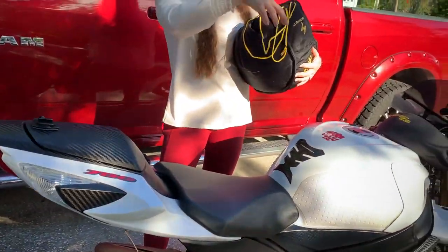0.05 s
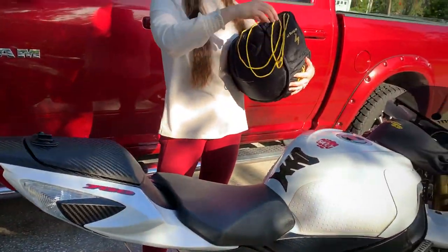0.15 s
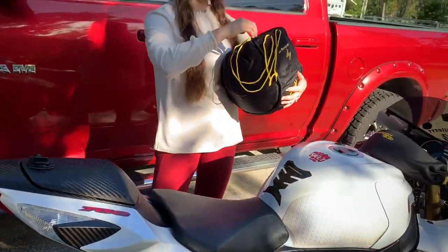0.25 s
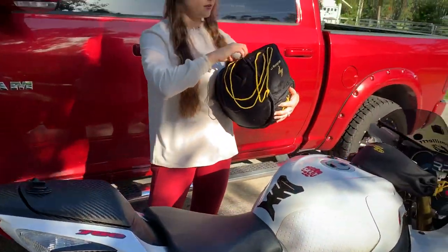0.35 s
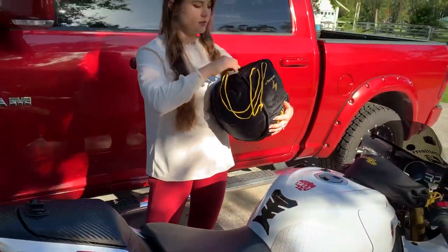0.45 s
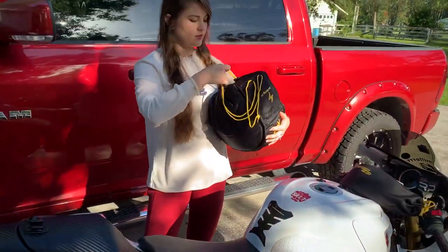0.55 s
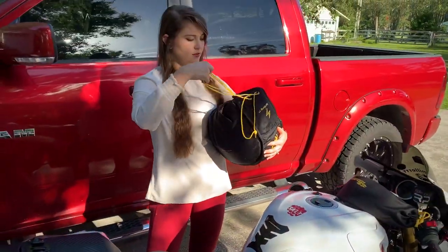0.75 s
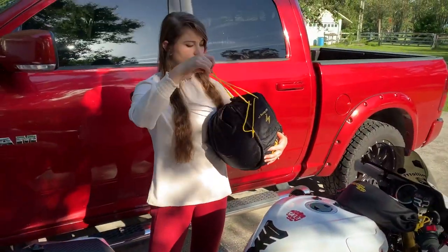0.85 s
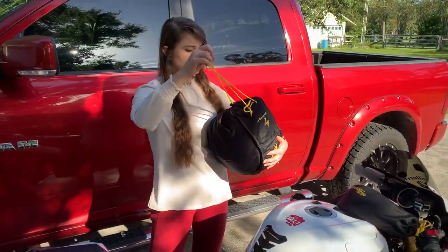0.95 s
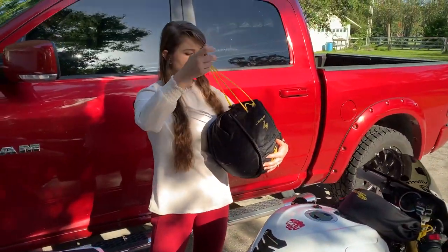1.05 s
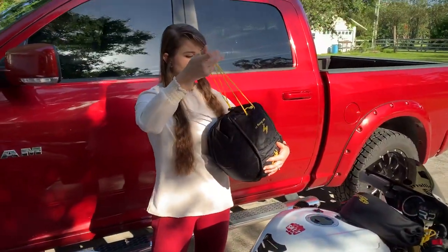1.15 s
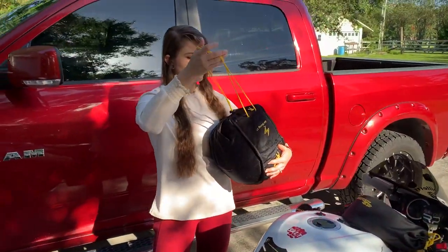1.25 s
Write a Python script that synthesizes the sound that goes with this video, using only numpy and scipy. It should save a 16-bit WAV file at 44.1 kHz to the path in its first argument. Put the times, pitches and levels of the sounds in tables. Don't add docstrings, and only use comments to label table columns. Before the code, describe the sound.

Brief fabric rub, then one loud door-like slam with latch ticks and a low boom that clips. It dies quickly into a quiet yard with distant traffic rumble and a high, quickening cricket rasp.

```python
import sys
import numpy as np
from scipy import signal
from scipy.fft import rfft, irfft
from scipy.io import wavfile

SR = 44100
rng = np.random.default_rng(int(sys.argv[2]) if len(sys.argv) > 2 else 0)


def attenuation_scalar(level_db):
    decades = np.asarray(level_db, float) / 20
    return 10 ** decades


def store_pcm(level_fs):
    pcm = np.round(np.clip(level_fs, -1, 1) * 32767).astype(np.int16)
    wavfile.write(sys.argv[1], SR, np.atleast_2d(pcm).T)


N = 57330

# frequency in Hz, density in dB per Hz.
RUMBLE_SPECTRUM = [(15, -56), (25, -27.5), (40, -9), (69, 4), (205, -18), (253, -13), (316, -25.5),
                   (442, -26), (700, -49), (910, -59), (1540, -120)]
# frequency in Hz, density in dB per Hz.
LEAF_SPECTRUM = [(350, -18.5), (600, -4), (1500, -8), (4500, -4), (7000, -7), (9000, -7.5), (12000, -20.5),
                 (16000, -21.5)]
# time in seconds, level in dB.
BREEZE = [(0, 9), (.15, 2.5), (.5, 4), (.7, 3.5), (1., 7), (1.3, 5)]
# frequency in Hz, likeness [0 to 1].
LIKENESS = [(40, .9), (200, 0.801), (800, 0.28), (3000, 0.23), (7000, 0.27), (10000, 1)]
# frequency in Hz, width in Hz, level in dB.
CHORUS = [(4530, 400, -85), (7020, 2300, -69), (973, 250, -76)]
# time in seconds, strokes so far [count].
STROKES = [(-.0038, -1), (.5043, 12), (.7292, 18), (.8435, 21), (1.3067, 39)]
# time in seconds, level in dB.
CRICKET_LEVEL = [(0, -62.5), (.45, -61.5), (.8, -62.5), (.9, -58.5), (1.15, -55.5), (1.3, -53.5)]
# frequency in Hz, width in Hz, level in dB.
WING_MODES = [(8750, 1200, -2), (12980, 2000, -1.5), (9490, 900, 15.5), (10300, 1000, 12),
              (10930, 810, 1.5)]
# start in seconds, length in seconds, level in dB, ringing in Hz, width in Hz.
SCUFFS = [
    (0.098, 0.019, -43, 1740, 630),
    (0.102, 0.027, -46.5, 3200, 2500),
    (.112, 0.032, -58, 10300, 2500),
    (0.562, 0.035, -53, 1034, 159),
    (0.969, 0.095, -59.5, 1950, 2500),
    (.0, 0.019, -40, 240, 250),
]
# time in seconds, push on the panel in dB, crack in dB, latch tick in dB.
CONTACTS = [(0.1975, -32, -30.5, -27), (0.2063, -24, -36.5, -40), (0.228, -14, -25, -32.5),
            (0.2395, -2.5, -16.5, -17), (.2500, 2.5, -42, -8.5), (0.26, -18.5, -20.5, -4.5),
            (0.277, -25, -31.5, -26.5), (0.295, -14, -33, -34), (0.307, -17, -34.5, -13),
            (0.3252, -25.5, -46, -15.5), (.3310, -24, -29.5, -17.5), (0.3561, -48, -34.5, -20),
            (0.372, -46, -33, -27), (0.402, -36.5, -42, -41)]
# frequency in Hz, level in dB, T60 in seconds.
PANEL_MODES = [(305, -22, 0.033), (348.3, -8.5, 0.1128), (421, -12.5, 0.11), (515.6, -4, 0.033),
               (579.6, -12.5, 0.036), (647.4, -16.5, 0.18), (844, -26.5, 0.076), (921, -30, 0.043),
               (1115.6, -17, 0.15), (1323, -11, 0.034), (1570, -15, 0.032)]
# frequency in Hz, level in dB, T60 in seconds.
LATCH_MODES = [(3240, -8.5, .02), (3510, -16.5, 0.0113), (2500, -22, 0.014), (4644, -22.5, 0.0044)]
# frequency in Hz, density in dB per Hz.
CRACK_SPECTRUM = [(290, -43.5), (500, -2.5), (2730, -6.5), (3340, -8.5), (4280, -10), (9490, -14.5),
                  (13400, -20), (16000, -33.5)]
# time in seconds, level in dB.
CRUNCH_LEVEL = [
    (0.19, -53),
    (0.196, -42),
    (0.212, -19.5),
    (0.222, -35),
    (0.244, -8.5),
    (0.278, -8),
    (0.294, -43),
    (0.38, -46.5),
    (0.45, -55.5),
]
# frequency in Hz, density in dB per Hz.
CRUNCH_SPECTRUM = [(200, -24.5), (500, -7.5), (1000, -4), (1700, -10), (2500, -22), (3350, -19.5),
                   (6000, -34), (16000, -44.5)]
# start in seconds, frequency in Hz (minus pulls inward), level in dB,
# pressed time in seconds, T60 after it in seconds.
HEAVES = [
    (.2070, 367, -17, 0.0082, 0.1),
    (0.23, 261, -32, 0.0017, .04),
    (0.2408, -208, 3.5, 0.01, 0.0069),
    (0.2605, -228, 2, .013, 0.052),
    (0.295, 239, -11.5, 0.027, 0.032),
    (0.309, 244, -14.5, 0.0047, 0.19),
    (0.241, 111.5, -15.5, 0.015, 0.093),
]

RUMBLE_DB, LEAVES_DB = -41.5, -60
AIR_LAG_S, AIR_PAN_DB = -0.00046, -0.3
STROKE_S, TEETH_HZ, TOOTH_DEPTH = 0.015, 390, 0.6
SWISH_DB, SWISH_T60_S, SWISH_BAND_HZ = -48.5, 0.62, [250, 2500]
PUSH_S, PANEL_SCATTER_DB, PANEL_OFFSET_SAMPLES = 0.00028, 6.5, 4
CRACK_T60_S, CRACK_ALIKE = 0.08, 0.63
CRUNCH_DB, GRAINS_PER_S, GRAIN_SPREAD_DB = -3, 7000, 2.5
TRIM_LAG_S, DOOR_LAG_S, DOOR_PAN_DB, HEAVE_PAN_DB = -0.00028, -0.00027, -0.5, 5
ECHO_DB, ECHO_T60_S = -18, 0.15
RISE_S, SHARP_START, SETTLE_S = 0.0023, 0.35, 0.0022
CABIN_S, CABIN_DB, CABIN_T60_S, CABIN_BAND_HZ = 0.27, -31.5, 0.66, [129, 424]
PORT_SPLIT_HZ, PORT_LAG_S = 7700, 0.000227
MIC_LOW_HZ, TOP_HZ, CLIP_KNEE = 40, 16300, 8.0


def rms_one(x):
    return x / np.sqrt(np.mean(x ** 2) + 1e-20)


def in_time(rows):
    return np.interp(np.arange(N) / SR, *np.transpose(rows))


def at_hz(points, hz):
    f, v = np.transpose(points)
    return np.interp(np.log(hz), np.log(np.maximum(f, 1)), v)


def drift(rate_hz):
    r = np.exp(-80 * np.pi * rate_hz / SR)
    slow = signal.lfilter([1], [1, -2 * r, r * r], rng.standard_normal(N // 40 + 2002))[2000:]
    return np.interp(np.arange(N) / 40, np.arange(len(slow)), rms_one(slow - slow.mean()))


def clicks(s, db):
    out = np.zeros(N) + 1e-18
    out[(np.asarray(s) * SR).astype(int)] = attenuation_scalar(db)
    return out


def ring(x, hz, t60_s):
    r, w = attenuation_scalar(-60 / (t60_s * SR)), 2 * np.pi * hz / SR
    return signal.lfilter([0, np.sin(w)], [1, -2 * r * np.cos(w), r * r], x)


def peak(x, hz, width_hz):
    r = np.exp(-np.pi * width_hz / SR)
    poles = [1, -2 * r * np.cos(2 * np.pi * hz / SR), r * r]
    return signal.lfilter([(1 - r * r) / 2, 0, (r * r - 1) / 2], poles, x)


def double_peak(x, hz, width_hz):
    return peak(peak(x, hz, width_hz), hz, width_hz)


def bandpass(x, order, band_hz):
    return signal.sosfilt(signal.butter(order, band_hz, "band", fs=SR, output="sos"), x)


def third_octaves():
    edges = 25 * 2 ** np.arange(0, 9.5, 1 / 3)
    return [([a, b], np.sqrt(a * b)) for a, b in zip(edges, edges[1:])]


def colour(x, spectrum):
    out = 0
    for k, (band_hz, centre_hz) in enumerate(third_octaves()):
        out = out + attenuation_scalar(at_hz(spectrum, centre_hz)) * (-1) ** k * bandpass(x, 2, band_hz)
    return out


def place(x, lag_s, pan_db):
    pair = x + np.zeros((2, 1))
    hz = np.fft.rfftfreq(N + 512, 1 / SR)
    high = 1 / (1 + (PORT_SPLIT_HZ / (hz + 1)) ** 40)
    direct = (1 - high) * np.exp(-2j * np.pi * hz * lag_s)
    turn = direct - high * np.exp(-2j * np.pi * hz * PORT_LAG_S)
    left = irfft(rfft(pair[0], N + 512) * turn / np.abs(turn), N + 512)[:N]
    return np.array([left * attenuation_scalar(pan_db / 2), pair[1] * attenuation_scalar(-pan_db / 2)])


def far_noise(spectrum, patchy_db, fast_hz):
    out, together = 0, drift(2)
    white = rng.standard_normal((2, 2, N + 8000))
    for k, (band_hz, centre_hz) in enumerate(third_octaves()):
        mid, side = bandpass(white[k % 2], 2, band_hz)[:, -N:]
        alike = np.clip(at_hz(LIKENESS, centre_hz), 0, 1)
        flicker_db = patchy_db * (0.16 * together + drift(fast_hz))
        gain = attenuation_scalar(at_hz(spectrum, centre_hz) + flicker_db)
        out = out + gain * (np.sqrt(1 + alike) * mid + np.sqrt(1 - alike) * side * [[1], [-1]])
    return rms_one(out)


def traffic():
    return attenuation_scalar(RUMBLE_DB) * far_noise(RUMBLE_SPECTRUM, patchy_db=1.5, fast_hz=7.4)


def leaves():
    return attenuation_scalar(LEAVES_DB + in_time(BREEZE)) * far_noise(LEAF_SPECTRUM, patchy_db=2.12, fast_hz=25.0)


def chorus():
    out = 0
    for hz, width_hz, db in CHORUS:
        tone = rms_one(double_peak(rng.standard_normal(N), hz, width_hz))
        out = out + attenuation_scalar(db + 2.2 * drift(10.75)) * tone
    return attenuation_scalar(in_time(BREEZE)) * out


def cricket():
    count = in_time(STROKES)
    since_s = count % 1 / np.gradient(count) / SR
    vary_db = rng.standard_normal(60)[count.astype(int) + 1]
    stroke = np.clip(since_s / 0.001, 0, 1) * np.exp(-(since_s / STROKE_S) ** 2) * attenuation_scalar(vary_db)
    teeth = 1 + TOOTH_DEPTH * np.cos(2 * np.pi * TEETH_HZ * since_s)
    scrape = rng.standard_normal(N) + 0.255 * rng.standard_normal((2, N))
    rasp = stroke * teeth * scrape
    wings = sum(attenuation_scalar(db) * double_peak(rasp, hz, width_hz) for hz, width_hz, db in WING_MODES)
    return attenuation_scalar(in_time(CRICKET_LEVEL)) * rms_one(wings)


def cloth():
    t = np.arange(N) / SR
    swish = rms_one(bandpass(rng.standard_normal(N), 2, SWISH_BAND_HZ))
    out = attenuation_scalar(SWISH_DB - 60 * t / SWISH_T60_S) * swish
    for s, length_s, db, hz, width_hz in SCUFFS:
        shape = np.sin(np.pi * np.clip((t - s) / length_s, 0, 1) ** 0.6)
        out += attenuation_scalar(db) * shape * rms_one(double_peak(rng.standard_normal(N), hz, width_hz))
    return out


def crunch():
    size = attenuation_scalar(GRAIN_SPREAD_DB * np.minimum(rng.exponential(1, N), 4))
    grains = (rng.random(N) < GRAINS_PER_S / SR) * size * rng.choice([-1, 1], N)
    before, after = (CRUNCH_LEVEL[0][0] - 0.002, -100), (CRUNCH_LEVEL[-1][0] + 0.1, -90)
    level_db = in_time([before] + list(CRUNCH_LEVEL) + [after]) + CRUNCH_DB
    return attenuation_scalar(level_db) * rms_one(colour(grains, CRUNCH_SPECTRUM))


def panel(s, push_db):
    boom = np.zeros(N)
    for hz, db, t60_s in PANEL_MODES:
        luck_db = PANEL_SCATTER_DB * rng.standard_normal(len(s))
        boom += ring(clicks(s, push_db + db + luck_db), hz, t60_s)
    r = np.exp(-1 / (PUSH_S * SR))
    boom = signal.lfilter([1 - r], [1, -r], boom)
    return np.array([np.roll(boom, PANEL_OFFSET_SAMPLES), boom])


def latch(s, tick_db):
    ticks = np.zeros(N)
    for hz, db, t60_s in LATCH_MODES:
        ticks += ring(clicks(s, tick_db + db + 2 * rng.standard_normal(len(s))), hz, t60_s)
    return np.convolve(ticks, np.hanning(9) / 3)[:N]


def crack(s, crack_db):
    dying = signal.lfilter([1], [1, -attenuation_scalar(-60 / (CRACK_T60_S * SR))], clicks(s, crack_db))
    noise = CRACK_ALIKE * rng.standard_normal(N) + (1 - CRACK_ALIKE) * rng.standard_normal((2, N))
    return dying * rms_one(colour(noise, CRACK_SPECTRUM))


def door():
    s, push_db, crack_db, tick_db = np.transpose(CONTACTS)
    return panel(s, push_db) + latch(s, tick_db) + crack(s, crack_db) + crunch()


def yard_echoes(x):
    out = np.zeros((2, N))
    for side, lags_s in enumerate(rng.uniform(0.002, 0.09, (2, 14))):
        echo = clicks(lags_s, -60 * lags_s / ECHO_T60_S)[:SR // 10] * rng.choice([-1, 1], SR // 10)
        out[side] = signal.fftconvolve(x, echo)[:N]
    return attenuation_scalar(ECHO_DB) * bandpass(out, 1, [400, 6000])


def heaves():
    out = np.zeros(N)
    for s, hz, db, pressed_s, t60_s in HEAVES:
        since_s = np.maximum(np.arange(N) / SR - s, 0)
        turns = hz * (since_s + SHARP_START * SETTLE_S * (1 - np.exp(-since_s / SETTLE_S)))
        level = attenuation_scalar(db - 60 * np.maximum(since_s - pressed_s, 0) / t60_s)
        out += np.minimum(since_s / RISE_S, 1) * level * np.sin(2 * np.pi * turns)
    return out


def cabin():
    since_s = np.arange(N) / SR - CABIN_S
    noise = rms_one(bandpass(rng.standard_normal(N), 2, CABIN_BAND_HZ))
    return (since_s > 0) * attenuation_scalar(CABIN_DB - 60 * since_s / CABIN_T60_S) * noise


def scene():
    far = place(traffic() + leaves() + chorus(), AIR_LAG_S, AIR_PAN_DB)
    far = far + place(cricket(), 0, -0.97)
    near = place(cloth(), -0.00011, -0.12)
    slam = door()
    near = near + place(slam, TRIM_LAG_S, DOOR_PAN_DB) + yard_echoes(slam[0])
    near = near + place(heaves() + cabin(), DOOR_LAG_S, HEAVE_PAN_DB)
    return far + near


def top_cut(x):
    return signal.sosfilt(signal.butter(12, 16790, fs=SR, output="sos"), x)


def record(dry):
    x = signal.sosfilt(signal.butter(4, MIC_LOW_HZ, "high", fs=SR, output="sos"), dry)
    x = signal.sosfilt(signal.cheby2(8, 30, TOP_HZ, fs=SR, output="sos"), x)
    mix = x / (1 + np.abs(x) ** CLIP_KNEE) ** (1 / CLIP_KNEE)
    return top_cut(mix)


dry = scene()
out = record(dry)
store_pcm(out)
```